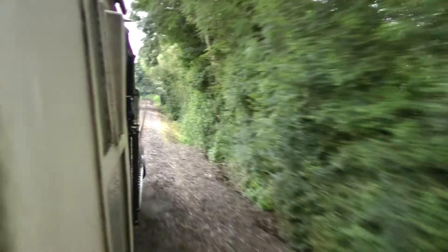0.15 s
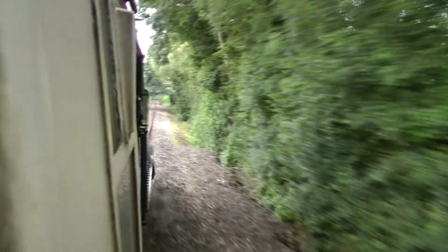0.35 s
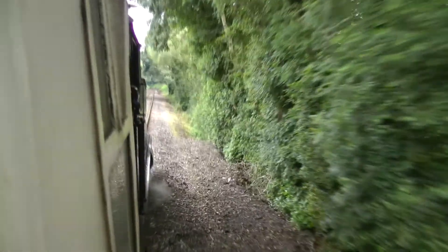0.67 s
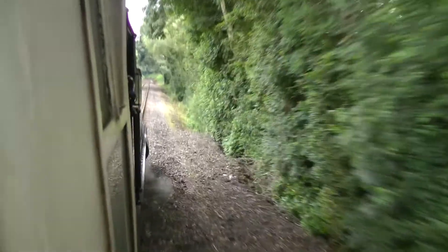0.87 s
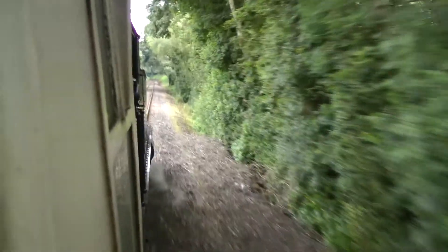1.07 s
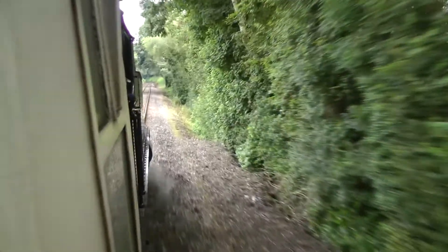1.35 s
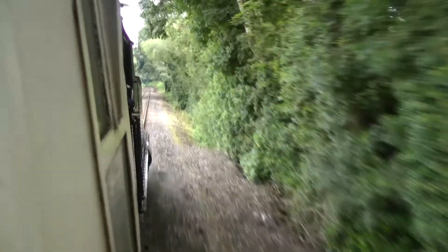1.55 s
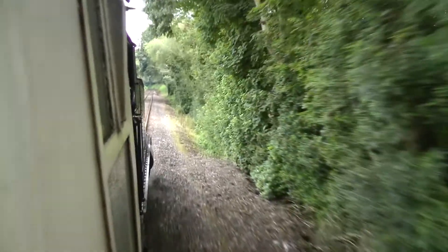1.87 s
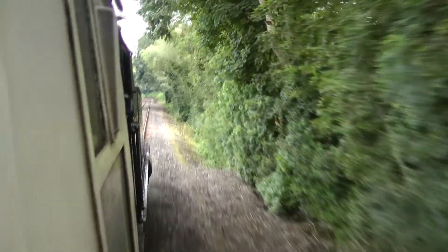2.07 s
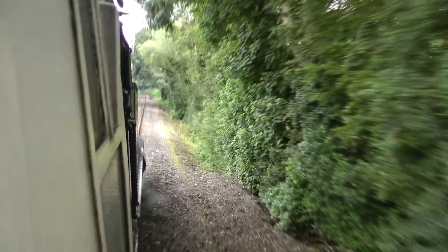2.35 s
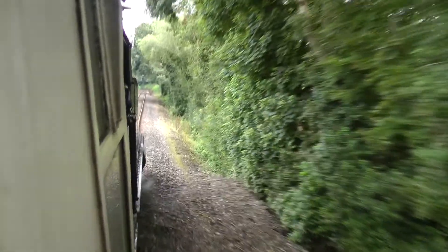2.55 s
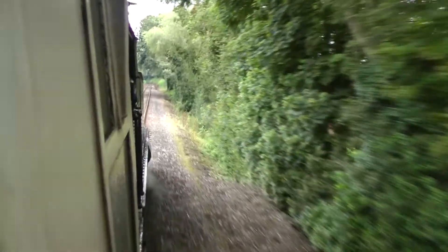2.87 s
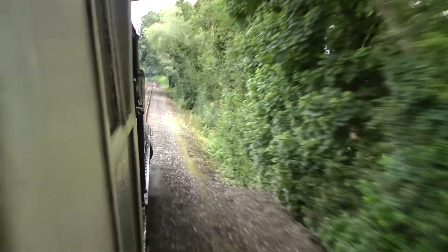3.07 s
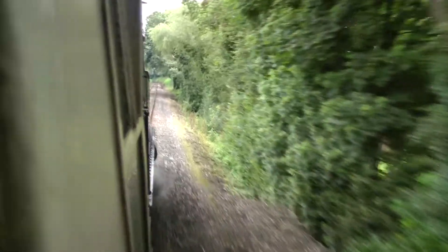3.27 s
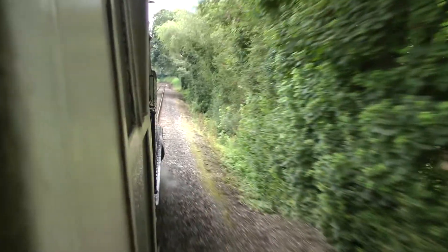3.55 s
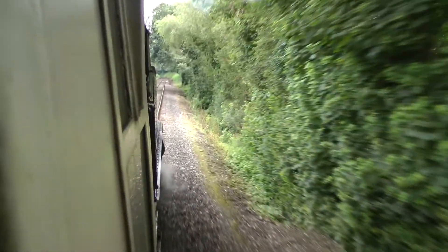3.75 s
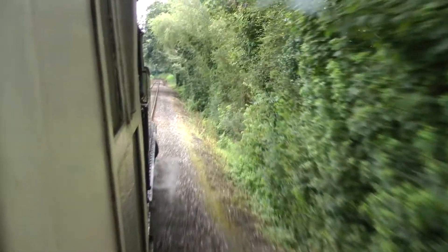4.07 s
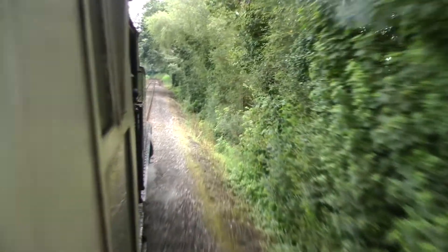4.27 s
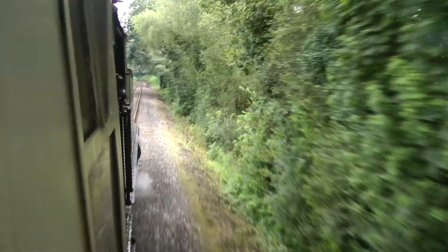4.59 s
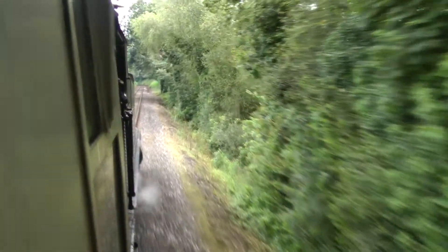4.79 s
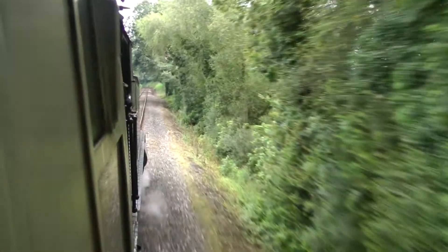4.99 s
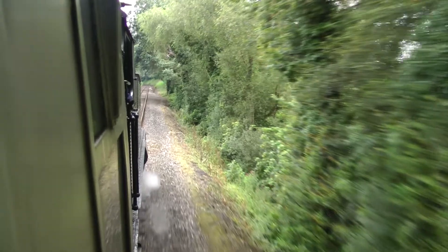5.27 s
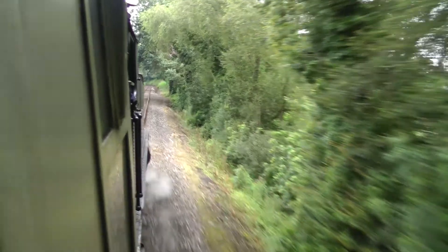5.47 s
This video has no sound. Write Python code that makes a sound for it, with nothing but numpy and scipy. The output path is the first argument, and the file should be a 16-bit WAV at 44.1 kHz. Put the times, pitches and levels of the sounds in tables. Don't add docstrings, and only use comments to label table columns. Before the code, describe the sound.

Heard from a carriage window some way behind, a steam locomotive works uphill with steady, rapid chuffs, about five a second in uneven groups of four. Each starts with a thump, roars and hisses, sometimes with a thin whistle. Small steam puffs come before every second chuff. Low wheel rumble, light wind and a few coupling knocks lie below; close hedges return a soft diffuse echo.

```python
import sys
import numpy as np
from scipy import signal
from scipy.fft import rfft, irfft, next_fast_len
from scipy.io import wavfile
from scipy.ndimage import uniform_filter1d

SR = 44100
rng = np.random.default_rng(int(sys.argv[2]) if len(sys.argv) > 2 else 0)


def unload_wav(signal):
    wavfile.write(
        sys.argv[1],
        SR,
        np.round(np.clip(np.atleast_2d(signal).T, -1, 1) * 32767).astype(np.int16),
    )


def attenuation_scalar(level_db):
    decades = np.asarray(level_db, float) / 20
    return 10 ** decades


N = 248283
TIME_S = np.arange(N) / SR
SIZE = next_fast_len(N, True)
HZ = np.maximum(np.arange(SIZE // 2 + 1) * SR / SIZE, 1)

# t/s, jet roar level/dB, chimney and smokebox re roar level/dB, pressure front peak level/dB
BLASTS = [(-.0057, -20, -.4, -18), (.1891, -19.6, 0, -18), (.38, -22.8, 1.2, -17), (.559, -20.4, 2, -17),
          (.763, -21.6, 1.2, -13), (.9554, -19.2, 1.2, -13), (1.1485, -21.9, 0, -12.5),
          (1.3271, -19.2, -1.3, -11.5), (1.5321, -18.8, -1.5, -17), (1.7263, -19.2, 1.8, -23),
          (1.9197, -23.8, 1.1, -20), (2.0967, -20.1, .5, -11), (2.3018, -20.7, 1.3, -15),
          (2.4962, -20.3, 1.1, -26), (2.6891, -22.4, -.2, -17), (2.8666, -20.2, .3, -13),
          (3.0735, -19.5, -2, -11), (3.2659, -20.2, 1.1, -13), (3.458, -22.6, 1.1, -15),
          (3.6365, -21, 1.6, -14), (3.8415, -20.1, -1.6, -15), (4.0362, -20.9, 2.6, -18),
          (4.228, -22.5, 1.2, -20), (4.4077, -22.6, 2.9, -13.5), (4.611, -22.4, 2.6, -14),
          (4.8073, -20.7, 1.6, -15), (4.997, -23.2, .8, -21), (5.1782, -19.6, -1.1, -21),
          (5.3842, -22, 1.5, -13), (5.576, -20.6, 3.1, -13)]


def at_level(x, db=0):
    return x * attenuation_scalar(db) / np.sqrt(np.mean(x ** 2))


def along(table, column=1):
    table = np.array(table)
    return np.interp(np.log(HZ), np.log(table[:, 0]), table[:, column])


def resonance(hz, width_hz):
    return 1 / (1 + 1j * (HZ ** 2 - hz ** 2) / (HZ * width_hz))


def sound(spectrum):
    return irfft(spectrum, SIZE)[:, :N]


def ports(direct, gain, scatter=1):
    # f/Hz, left minus right level/dB, likeness [0-1], left phase lead [rad]
    port_table = [(30, -4.5, 0.8, .05), (80, -4.6, .85, .15), (140, -4.3, .99, .25), (290, -3.2, .95, .45),
                  (640, .7, .77, 0.33), (1400, 1.4, 0.69, .37), (2800, .6, 0.68, 0.4),
                  (5000, 1.2, 0.49, 1.4), (7900, 1.5, 0.6, 1.25), (15500, 1.5, 0.4, 2.8)]
    port_sides = np.array([[.5], [-.5]])
    like = 1 - scatter * (1 - np.clip(along(port_table, 2), 0, 1))
    phase = np.exp(1j * port_sides * along(port_table, 3))
    shared = np.sqrt(like) * rfft(direct, SIZE) * phase
    scattered = rng.standard_normal((2, len(HZ))) + 1j * rng.standard_normal((2, len(HZ)))
    scattered = scattered * np.sqrt((1 - like) * N / 2)
    return (shared + scattered) * gain * attenuation_scalar(port_sides * along(port_table))


def walk(rate):
    hold = int(SR / rate)
    held = np.repeat(rng.standard_normal(N // hold + 1), hold)
    return 1.3 * uniform_filter1d(uniform_filter1d(held, hold), hold)[:N]


def eddies(crackle_rate, crackle):
    spikes = (rng.random(N) < crackle_rate / SR) * rng.exponential(1, N)
    return at_level(rng.standard_normal(N) + crackle * at_level(spikes - spikes.mean()))


def patchy(spectrum, low_hz, count, rate, patch_db):
    place = np.clip(2 * np.log2(HZ / low_hz), 0, count - 1)
    total = 0
    for k in range(count):
        band = np.maximum(1 - np.abs(place - k), 0)
        total = total + sound(spectrum * band) * attenuation_scalar(patch_db * walk(rate))
    return at_level(total)


def flow(times, dbs, rises, layer):
    layer_flows = {"roar": (.007, .009, .047, 1.15, 7., -12.5), "bark": (.006, .009, .053, 1.25, 5., -13.),
                   "chimney": (.004, .009, .058, 1.6, 5.2, -14.),
                   "whistle": (.004, .007, .06, 1.2, -8.5, -5.),
                   "hiss": (0.0043, 0.0094, .088, 1.52, 7., -13.),
                   "leak": (-.003, .008, .05, 1.4, 1.6, -14.)}
    hedge_t60_s, hedge_delay_s = .6, .03
    delay, rise, fall, round_top, trim_db, echo_db = layer_flows[layer]
    power = np.zeros(N)
    for s, db, slow in zip(times, dbs, rises):
        first = max(int((s + delay) * SR), 0)
        t = np.maximum(np.arange(first, min(first + SR // 2, N)) / SR - s - delay, 0)
        opening = (1 - np.exp(-t / (rise * slow))) ** 2
        emptying = np.exp(1 - (1 + (t / fall) ** 2) ** (round_top / 2))
        echo = (1 - np.exp(-t / hedge_delay_s)) * attenuation_scalar(echo_db - 60 * t / hedge_t60_s)
        power[first:first + len(t)] += attenuation_scalar(2 * (db + trim_db)) * ((opening * emptying) ** 2 + echo ** 2)
    return np.sqrt(power)


def wheels():
    # f/Hz, level/dB
    rolling_colour = [(30, -25), (85, -8), (150, 2), (300, 1), (700, -4), (1300, -7), (2700, -10.5),
                      (3600, -12), (5000, -16.5), (8000, -19.5), (12000, -27), (15500, -46)]
    # t/s, level/dB
    gusts = [(0, -38), (1.0, -41), (3.2, -42), (3.5, -46), (3.85, -38), (4.3, -42), (5.0, -44), (5.63, -38)]
    rumble = at_level(sound(ports(rng.standard_normal(N), attenuation_scalar(along(rolling_colour)))), -29)
    rumble = rumble * attenuation_scalar(.9 * walk(15) + .6 * walk(3))
    wind = at_level(sound(ports(eddies(30., .5), resonance(40., 60.) * resonance(45., 90.))))
    return rumble + wind * attenuation_scalar(2.5 * walk(12) + np.interp(TIME_S, *np.transpose(gusts)))


def coupling():
    # t/s, peak level/dB, f/Hz
    knocks = [
        (.135, -24, 380),
        (1.654, -15, 417),
        (5.162, -27, 400),
    ]
    t60_s, push_s = .07, .002
    out, t = np.zeros(N), np.arange(SR // 10) / SR
    for s, db, hz in knocks:
        envelope = attenuation_scalar(db - 60 * t / t60_s) * (1 - np.exp(-t / push_s))
        out[int(s * SR):][:len(t)] += envelope * np.sin(2 * np.pi * hz * t)
    return sound(ports(out, 1, scatter=0))


def gland():
    # lead t/s, level/dB
    strokes = [
        (.027, -23.5),
        (.035, -21),
    ]
    # f/Hz, level/dB
    leak_colour = [(700, -30), (1500, -14), (2300, -10), (3700, -9.5), (6500, -13), (9000, -18),
                   (11600, -19), (15500, -29)]
    s = np.transpose(BLASTS)[0, ::2]
    lead, db = np.transpose(strokes)[:, np.arange(len(s)) % len(strokes)]
    leak = at_level(sound(ports(eddies(900., .27), attenuation_scalar(along(leak_colour))))) * attenuation_scalar(.9 * walk(40))
    return leak * flow(s - lead, db, np.ones(len(s)), "leak")


def fronts(times, dbs):
    push = np.zeros(N)
    push[(times[times > 0] * SR).astype(int)] = attenuation_scalar(dbs[times > 0])
    humps = np.convolve(push, np.hanning(int(.006 * SR)))[:N]
    ring = .35 + 1.85 * resonance(168., 68.)
    return irfft(rfft(humps, SIZE) * ring * resonance(70., 450.), SIZE)[:N] * attenuation_scalar(-.3)


def locks(times):
    # delay after the blast t/s, level/dB
    end_tones = [(.022, -26), (.03, -30), (.031, -25.5), (.022, -26)]
    # t/s, level/dB, f/Hz
    shrieks = [(.79, -23, 2650), (1.345, -16, 2790), (2.721, -21, 2740), (2.917, -25, 2730),
               (3.093, -20, 2720), (3.666, -22, 2760), (4.628, -23, 2700), (5.423, -24, 2710)]
    lock_width_s, lock_hz, spread_hz, spread_db = .03, 2710., 45., 1.5
    relapse_gap_s, relapse_width_s, relapse_db, relapse_fade_db = .028, .011, -25.5, -2.
    rows = [(s, db, lock_width_s, hz) for s, db, hz in shrieks]
    for k, s in enumerate(times):
        after, first_db = end_tones[k % len(end_tones)]
        for j in range(3):
            late, loud, pitch = rng.standard_normal(3)
            start = s + after + relapse_gap_s * j * (1 + .3 * late)
            db = relapse_db + relapse_fade_db * j if j else first_db
            width = relapse_width_s if j else lock_width_s
            rows.append((start, db + spread_db * loud, width, lock_hz + spread_hz * pitch))
    return rows


def whistles(times):
    tone, waver = np.zeros(N), 1 + .012 * walk(150)
    for s, db, width, hz in locks(times):
        span = np.arange(max(int((s - .05) * SR), 0), min(int((s + .05) * SR), N))
        swell = np.exp(-(2 * (span / SR - s) / max(.7 * width, .003)) ** 2)
        tone[span] += attenuation_scalar(db + 3.2) * swell * np.sin(2 * np.pi * hz * np.cumsum(waver[span]) / SR)
    return tone


def jet_roar():
    # f/Hz, level/dB
    roar_colour = [(400, -20), (800, -3), (1100, -1), (1700, -1), (2400, -2.8), (2900, -5), (3500, -8.5),
                   (4600, -15), (8000, -34), (16000, -50)]
    roar = patchy(ports(eddies(400., .5), attenuation_scalar(along(roar_colour))), 900., count=4, rate=35., patch_db=2.2)
    return roar * attenuation_scalar(1.2 * walk(70))


def jet_hiss():
    # f/Hz, level/dB
    hiss_colour = [(1000, -30), (2500, -0.5), (4000, -3.5), (5000, -8), (7200, -7), (9500, -11.5),
                   (12000, -15), (15500, -27)]
    return at_level(sound(ports(eddies(900., .27), attenuation_scalar(along(hiss_colour))))) * attenuation_scalar(.9 * walk(50))


def smokebox_bark():
    # f/Hz, width f/Hz, level/dB
    cavity_modes = [(340, 120, -.8), (550, 170, -2.), (720, 160, -1.5)]
    response = 0
    for k, (hz, width_hz, db) in enumerate(cavity_modes):
        response = response + (-1) ** k * attenuation_scalar(db) * resonance(hz, width_hz)
    return patchy(ports(eddies(150., .5), response * resonance(550., 900.)), 340., count=3, rate=30., patch_db=2.8)


def chimney_boom():
    return at_level(sound(ports(eddies(60., .29), resonance(176., 110.) * resonance(195., 220.))))


def nozzle_whistle():
    return at_level(sound(ports(eddies(100., .3), resonance(2725., 105.))))


def blasts():
    # valve lead t/s, rise factor [1], then blast, hiss, whistle, front level/dB
    cylinder_ends = [
        (.001, 1.05, .8, -2., .5, -1.5),
        (.001, 1.15, -.2, .8, -4.5, .5),
        (.011, 1.9, 2.8, -4.5, 2.5, -9.),
        (.001, .9, .2, .5, -.3, .5),
    ]
    # t/s, level/dB
    boiler_pressure = [(0, -29.5), (1.1, -27.4), (1.9, -29.6), (2.6, -28.2), (3.4, -29), (4.0, -27.5),
                       (5.63, -27.7)]
    s, roar_db, body_db, front_db = np.transpose(BLASTS)
    end = np.arange(len(s)) % len(cylinder_ends)
    lead, slow, end_db, end_hiss_db, end_whistle_db, end_front_db = np.transpose(cylinder_ends)[:, end]
    opens, roar_db = s - lead, roar_db + end_db
    body_db = roar_db + body_db
    hiss_db = np.interp(s, *np.transpose(boiler_pressure)) + end_db + end_hiss_db
    out = jet_roar() * flow(opens, roar_db, slow, "roar")
    out += jet_hiss() * flow(opens, hiss_db, slow, "hiss")
    out += chimney_boom() * flow(opens, body_db, slow, "chimney")
    out += smokebox_bark() * flow(opens, body_db, slow, "bark")
    out += nozzle_whistle() * flow(opens, roar_db + end_whistle_db, slow, "whistle")
    return out + sound(ports(whistles(s) + fronts(s, front_db + end_front_db), 1, scatter=0))


def scene():
    return wheels() + coupling() + gland() + blasts()


def low_pass(x):
    return signal.sosfilt(signal.butter(12, 15800, fs=SR, output="sos"), x)


def record(dry):
    # t/s, level/dB
    duck = [
        (.048, 0),
        (.054, -4.),
        (.13, -2.5),
        (.19, 0),
    ]
    ceiling = .99
    ducked = dry * attenuation_scalar(np.interp(TIME_S, *np.transpose(duck)))
    rounded = ducked / (1 + (ducked / ceiling) ** 4) ** .25
    return low_pass(rounded)


dry = scene()
out = record(dry)
unload_wav(out)
```